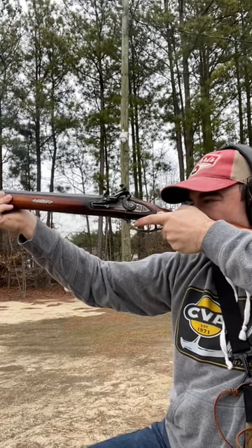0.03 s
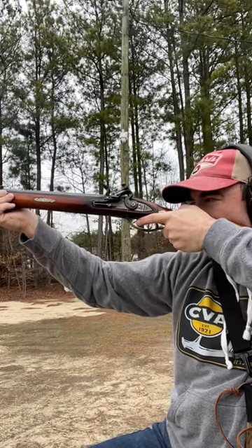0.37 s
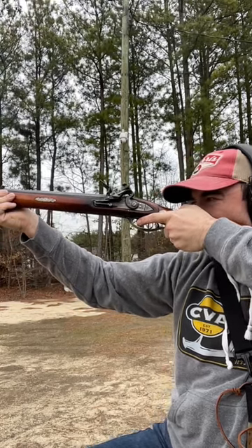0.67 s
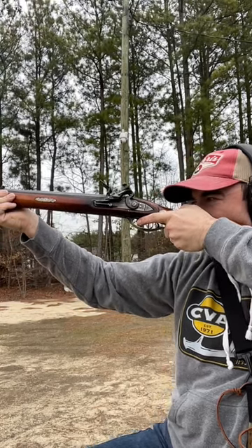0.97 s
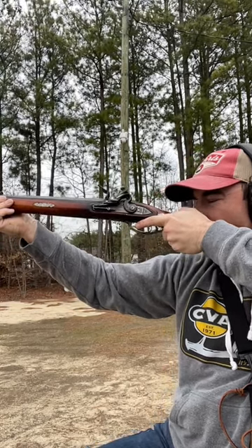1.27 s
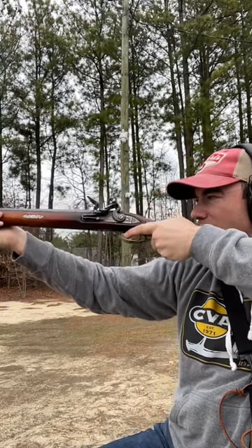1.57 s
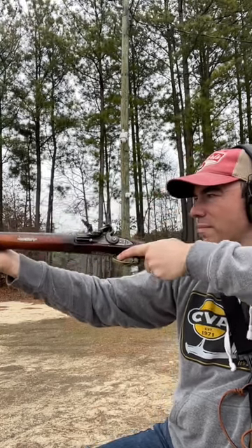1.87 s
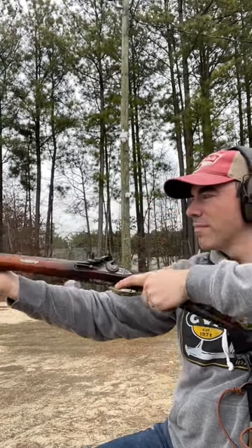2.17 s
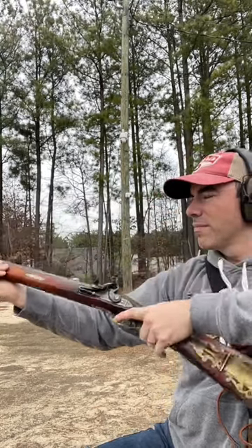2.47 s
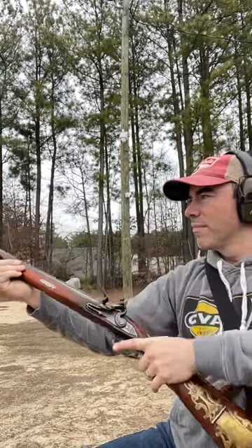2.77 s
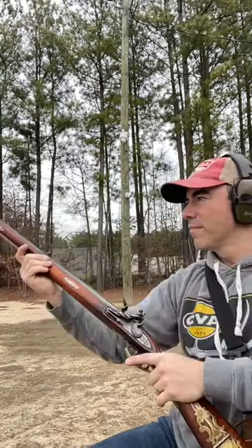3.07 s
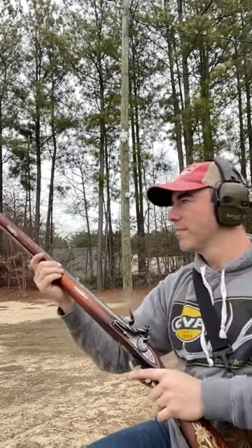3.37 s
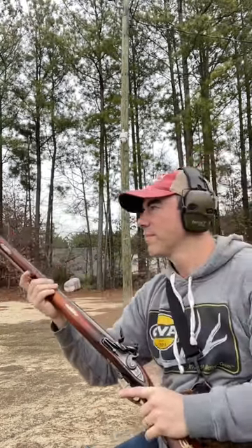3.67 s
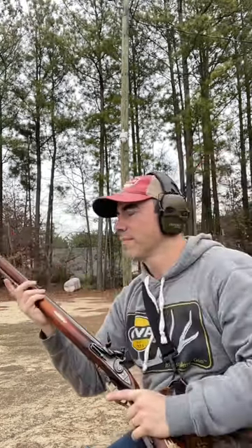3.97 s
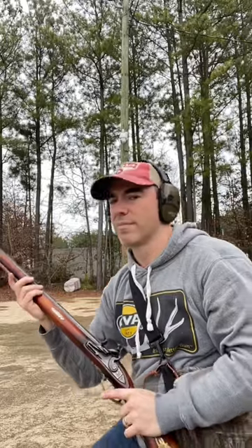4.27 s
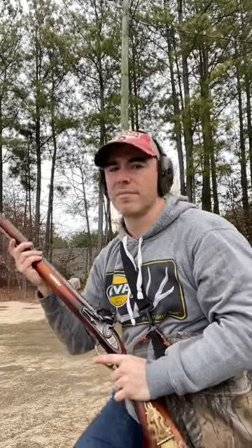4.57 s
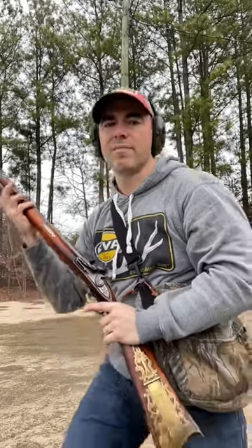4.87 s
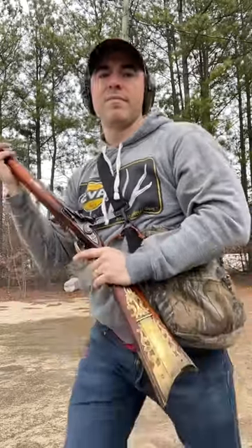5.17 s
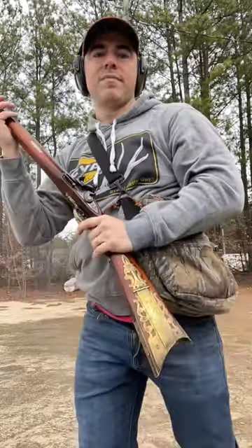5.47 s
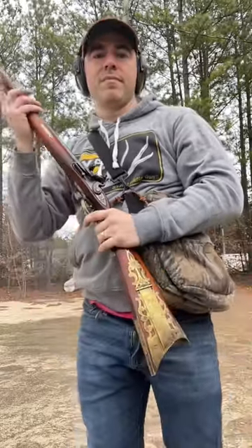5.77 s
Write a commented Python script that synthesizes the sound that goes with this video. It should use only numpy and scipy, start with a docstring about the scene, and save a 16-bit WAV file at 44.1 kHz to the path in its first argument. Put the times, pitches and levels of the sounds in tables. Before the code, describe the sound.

A flintlock rifle fires once in slow motion, a deep, muffled boom followed by a dark, surging roll. After about a second, a thin click marks a jump to normal speed, and a brighter, hissing echo fades through the surrounding trees. Faint knocks of wood and metal and a soft rustle of cloth follow as the rifle is handled. Light air puffs on the microphone over a quiet outdoor hush.

```python
"""On a shooting range ringed by pines, a flintlock rifle is fired. For the first second the sound runs
four times slow: the blast is a deep boom and its echo a dark roll. Then it clicks to true speed and
the echo hisses away through the trees, while air puffs softly on the microphones. The shooter lowers
the rifle and stands up, with small knocks of wood and metal and a rustle of cloth."""
import sys
import numpy as np
from scipy import signal
from scipy.fft import rfft, irfft, next_fast_len
from scipy.io import wavfile

SR = 44100
rng = np.random.default_rng(int(sys.argv[2]) if len(sys.argv) > 2 else 0)


def master(y):
    """Save y as 16-bit WAV."""
    cut = np.clip(np.atleast_2d(y).T, -1, 1)
    pcm = np.round(cut * 32767)  # scale
    wavfile.write(sys.argv[1], SR, pcm.astype(np.int16))


N = 265041
TIME = np.arange(N) / SR
SIZE = next_fast_len(N + SR // 2)
HZ = np.fft.rfftfreq(SIZE, 1 / SR)
SLOW, SLOW_ENDS_S, TRUE_SPEED_S = 4, 1.042, 1.049  # SLOW is how many times slower the opening runs

# How the two microphones hear the range. Each row: pitch in Hz at true speed, left over right in dB,
# left's lead in radians, how alike the sides are from 0 to 1.
MIC_PAIR = [(60, -1.05, 0.08, 1), (170.7, 2, 0.8, 0.89), (320, 0, 2.2, 0.2), (444, 7.5, 2.91, 0.4),
            (760, 7.5, 4.65, 0.9), (930, 5.5, 5.28, 0.95), (1140, -0.4, 6.16, 0.4), (1530, 5.5, 5, 0.9),
            (1730, 0.35, 5.05, 0.7), (2180, -1, 5.4, 1), (3360, 0, 5.75, 0.95), (6750, 0.4, 3.77, 1)]
# The tone of each sound. Each row: pitch in Hz at true speed, relative strength in dB.
ROLL_TONE = [(30, -3), (110, -2), (220, -5), (380, -3.5), (520, -3.5), (690, -0.5), (860, -6.5),
             (1030, -8.5), (1200, -3.5), (1380, -1), (1620, -17), (2700, -20), (4000, -27), (6500, -40.5)]
BLAST_TONE = [(60, -29), (220, -23.5), (360, 5), (500, -11.5), (690, 1.5), (880, -15.5), (1020, -17.5),
              (1290, 1.5), (1600, -15.5), (2700, -15), (4500, -25), (7000, -35), (9000, -44.5),
              (9700, -42.5), (10400, -55.5), (60000, -69.5)]
ECHO_TONE = [(60, -7.5), (200, 1), (420, 4.5), (700, 3), (860, -3.5), (1030, -6), (1180, -2), (1370, -7.5),
             (1600, -17.5), (2200, -17), (2800, -18), (4000, -28.5), (5500, -38.5), (6500, -46.5)]
BREEZE_TONE = [(10, -8.5), (25, 2.5), (45, 4), (70, -15), (130, -19.5), (400, -65)]
OUTDOOR_TONE = [(30, -5.5), (300, 11.5), (1300, -21), (1900, -23), (6000, -31), (16000, -42)]
GEAR_TONE = [(200, -25), (430, 2), (700, -7), (1000, 2), (1350, 0.5), (1750, -17.5), (3000, -29),
             (8000, -54)]
HISS_TONE = [(900, -31), (1800, 9), (2700, 8), (4500, -1), (6000, -5), (8000, -27), (14000, -50)]
# Surges of the slow roll. Each row: middle and half length in seconds, body and bass boosts in dB.
ROLL_SURGES = [(.285, 0.054, 5, 4), (.41, 0.038, 0, 9.5), (.69, 0.038, 0.5, 9), (.812, 0.018, 3.5, 0),
               (.935, 0.013, 1, 11), (1.025, .02, 2.5, 5)]
# The slowed shot and its single echoes. Each row: time in seconds, level in dB,
# treble cut in dB per kHz at true speed (below zero means no cut).
BLAST_WAVES = [(0.131, -25, 9), (0.1754, -0.5, -2), (0.1824, -12, 2), (0.2102, -24.5, -3.5),
               (0.271, -14, 7), (0.383, -14.5, 11.5), (0.733, -16, 8), (0.928, -13.5, 7.5),
               (1.0289, -24.5, 2)]
# Stands of trees that each send back one swell of echo.
# Each row: middle and half length in seconds, body and bass boosts in dB.
TREE_SWELLS = [(1.15, 0.019, 1, 14), (1.33, .06, 1.5, 9), (1.66, 0.062, 2, 7.5), (2.27, 0.16, 1.5, 6),
               (2.73, 0.045, .5, 8.5), (3.3, 0.25, -0.5, 6)]
# The ring that stands out in the early echo and fades as it ages. Each row: pitch in Hz, width in Hz, boost in
# dB.
HOLLOW_RING = [(700, 350, 3.5), (1260, 220, 8)]
# Hard, sharp echoes. Each row: time in seconds, level in dB.
HARD_ECHOES = [(1.1515, -20), (1.1659, -20.5)]
# Puffs of air as the shooter stands up. Each row: middle and half length in seconds, level in dB.
AIR_PUFFS = [(5.139, 0.065, -70.5), (5.427, 0.042, -67.5), (5.658, .045, -59), (5.821, 0.046, -55)]
# Rifle and gear being handled. Each row: start in seconds, then in dB the knock's relative level
# and what is added to it for the thud and for the tick.
GEAR_KNOCKS = [(2.523, -60, -17, -5), (3.977, -59, 4, -47), (4.033, -65, -14, -12), (4.15, -48, -32, -26),
               (4.857, -64.5, -13, -20), (4.938, -52.5, -9.5, -24), (4.972, -66, -11, -26),
               (5.137, -54, -15, -22), (5.324, -67, -10, -12), (5.576, -67, -12, -8),
               (5.856, -61.5, -18, -28), (5.902, -65, -18, -20), (5.938, -75, -16, -20)]
# The notes of the wooden stock. Each row: pitch in Hz, relative level in dB, seconds to fade by 60 dB.
STOCK_NOTES = [(239, 2, 0.056), (402, 5, 0.028), (593, 4.5, 0.017)]
# Sleeves and bag brushing. Each row: middle and half length in seconds, brush and hiss levels in dB.
CLOTH_SWISHES = [(3.1, 0.041, -87, -91.5), (3.488, 0.016, -68, -80), (3.542, 0.049, -97, -97),
                 (3.906, 0.26, -91, -100.5), (4.243, 0.022, -77, -85), (4.839, 0.16, -90, -101),
                 (5.022, 0.0079, -65.5, -96), (5.121, 0.18, -87, -98), (5.602, .12, -88, -99),
                 (5.816, 0.015, -70.5, -89), (5.917, 0.1, -82.5, -94)]


def amp(db):
    """Turn decibels into a number to multiply by."""
    return 10 ** (np.asarray(db) / 20)


def together(a_db, b_db):
    """The level in dB of two unrelated sounds heard at once."""
    return 20 * np.log10(np.hypot(amp(a_db), amp(b_db)))


def look_up(table, hz):
    """Read a table's columns at any pitch, gliding between its rows."""
    pitches, *columns = np.transpose(table)
    return np.squeeze([np.interp(np.log(hz + 1), np.log(pitches + 1), column) for column in columns])


def filtered(x, response):
    """Turn each pitch in x up or down by the given amount."""
    return irfft(rfft(x, SIZE) * response, SIZE)[..., :N]


def below(edge_hz, order=8):
    """A filter that keeps the lows; a higher order gives a sharper edge."""
    return 1 / np.sqrt(1 + (HZ / edge_hz) ** (2 * order))


def above(edge_hz, order=8):
    """The matching filter that keeps the highs."""
    return np.sqrt(1 - below(edge_hz, order=order) ** 2)


def mics(slow=1):
    """Left and right filters for a sound from down the range."""
    tilt_db, lead, _ = look_up(MIC_PAIR, HZ * slow)
    left = amp(tilt_db / 2) * np.exp(.5j * lead)
    return np.array([left, 1 / left]) / np.sqrt(np.cosh(np.log(amp(tilt_db))))


def scatter(slow=1, clicks_per_s=300, click_share=.3):
    """A stereo noise spectrum with clicks standing out, like single trunks among countless echoes."""
    clicks = rng.standard_normal(N) * (rng.random(N) < clicks_per_s / slow / SR)
    shared = np.sqrt(click_share) * clicks / clicks.std()
    shared += np.sqrt(1 - click_share) * rng.standard_normal(N)
    alike = np.clip(look_up(MIC_PAIR, HZ * slow)[2], 0, 1)
    separate = rfft(rng.standard_normal((2, N)), SIZE)
    return mics(slow) * (np.sqrt(alike) * rfft(shared, SIZE) + np.sqrt(1 - alike) * separate)


def sound(spectrum):
    """Turn a stereo spectrum into a wave whose middle has an average (rms) level of 1."""
    pair = irfft(spectrum, SIZE)[:, :N]
    return pair / np.sqrt(np.mean(pair.mean(0) ** 2) + 1e-30)


def pulse(s, response):
    """One pressure pulse of height 1 at time s."""
    wave = irfft(response * np.exp(-2j * np.pi * HZ * s), SIZE)[:, :N]
    return wave / np.abs(wave).max()


def fade(s, fade_s, rise_s=0.00016):
    """A quick rise at time s, then a fall of 60 dB every fade_s seconds."""
    start = round(s * SR)
    age = np.arange(min(SR // 2, N - start)) / SR
    shape = (1 - np.exp(-age / rise_s)) * np.exp(-np.log(1000) * age / fade_s)
    return np.pad(shape, (start, N - start - len(age)))


def swell(s, half):
    """A smooth hump of height 1 around time s."""
    return np.exp(-.5 * ((TIME - s) / half) ** 2)


def boosts(rows):
    """The dB that a table of swells adds to the body and to the bass."""
    return sum(np.outer([body_db, bass_db], swell(s, half)) for s, half, body_db, bass_db in rows)


def slow_roll(body_db=-36, bass_db=-42.5):
    """The first echoes from the trees, two octaves down: a surging roll over a deep bass."""
    body_boost, bass_boost = boosts(ROLL_SURGES)
    tone = amp(look_up(ROLL_TONE, HZ * SLOW)) * below(1680, order=40)
    echoes = scatter(SLOW, clicks_per_s=1100, click_share=0.019) * tone
    body = amp(body_db + body_boost) * sound(echoes * above(59))
    return body + amp(bass_db + bass_boost) * sound(echoes * below(47))


def rifle_boom(spray_db=-20.5, spray_peak_s=0.1753, spray_life_s=.039, rise_db_per_s=1149.5):
    """The slowed blast and its single echoes; the ground nearby throws back a short spray of sound."""
    tone = amp(look_up(BLAST_TONE, HZ * SLOW))
    heard = tone * mics(SLOW)
    heard *= np.exp(-1j * np.angle(heard[0]))  # the left side faces the muzzle and gets the clean pulse
    true_khz = HZ * SLOW / 1000
    waves = sum(-amp(db) * pulse(s, heard * amp(-max(cut, 0) * true_khz)) for s, db, cut in BLAST_WAVES)
    early, late = np.maximum(spray_peak_s - TIME, 0), np.maximum(TIME - spray_peak_s, 0)
    spray = amp(spray_db - rise_db_per_s * early) * np.exp(-(late / spray_life_s) ** 3)
    return waves + spray * sound(tone * scatter(SLOW, click_share=0))


def crackle(level_db=-72):
    """A faint bright crackle at the peak of the boom."""
    grains = scatter(clicks_per_s=700, click_share=.5) * above(2600, order=4) * below(6500, order=2)
    return amp(level_db) * swell(s=.180, half=.007) * sound(grains)


def speed_click(level_db=-27):
    """A thin click where the sound jumps to true speed."""
    tone = above(1600, order=3) * below(3400, order=2.5)
    return amp(level_db) * pulse(TRUE_SPEED_S, np.ones((2, 1)) * tone)


def forest_echo(near_db=-34, far_db=-46, low_db=-55):
    """The echo rolls on from ever farther trees; its ring softens and the air takes its top away."""
    age = np.maximum(TIME - TRUE_SPEED_S, 0)  # each number times age is a fall in dB per second
    body_boost, bass_boost = boosts(TREE_SWELLS)
    body_db = together(near_db - 27.5 * age, far_db - 9.5 * age) + body_boost
    bass_db = low_db - 6.5 * age + bass_boost  # the bass lingers longest
    hiss_db = near_db - 10.5 + 1.557 * (body_db - near_db)  # the hiss fades faster than the body
    tone = amp(look_up(ECHO_TONE, HZ))
    echoes = scatter(clicks_per_s=1300, click_share=0.27) * tone
    bass = sound(echoes * above(59, order=4) * below(110, order=5))
    middle = echoes * above(160, order=5) * below(1650)
    ring = amp(sum(db / (1 + (2 * (HZ - hz) / width) ** 2) for hz, width, db in HOLLOW_RING))
    ring_share = amp(-5 * age)
    body = ring_share * sound(middle * ring) + (1 - ring_share) * sound(middle)
    top = echoes * above(1400) * below(6600, order=40)
    bright_share = amp(-9 * age)
    hiss = bright_share * sound(top) + (1 - bright_share) * sound(top * below(2700, order=3))
    slap_tone = tone * ring * mics() * above(250, order=2) * below(1400, order=4)
    slaps = sum(amp(db) * pulse(s, slap_tone) for s, db in HARD_ECHOES)
    return amp(bass_db) * bass + amp(body_db) * body + amp(hiss_db) * hiss + slaps


def air(breeze_db=-60, fall_db_per_s=6.5, calm_db=-75, outdoor_db=-79):
    """Air rumbles on the microphones, settles and puffs again, over a steady outdoor hush."""
    settling_db = together(breeze_db - fall_db_per_s * (TIME - TRUE_SPEED_S), calm_db)
    strength = amp(settling_db) + sum(amp(db) * swell(s, half) for s, half, db in AIR_PUFFS)
    noise = scatter(click_share=0)
    rumble = strength * sound(noise * amp(look_up(BREEZE_TONE, HZ)))
    return rumble + amp(outdoor_db) * sound(noise * amp(look_up(OUTDOOR_TONE, HZ)))


def knocks(clack_db=-6, ring_db=-6, thud_db=1, tick_db=-3):
    """Stock, lock and gear knock lightly: a dull thud, a short woody clack and a trace of metal."""
    tone = amp(look_up(GEAR_TONE, HZ))
    blows, pushes, ring, tick = np.zeros((4, N))
    for s, db, extra_thud_db, extra_tick_db in GEAR_KNOCKS:
        blows[round(s * SR)] = amp(db + clack_db)
        pushes[round(s * SR)] = amp(db + extra_thud_db + thud_db)
        ring += amp(db + ring_db) * fade(s, fade_s=0.035)
        tick += amp(db + extra_tick_db + tick_db) * fade(s, fade_s=0.027)
    stock = sum(amp(db) * fade(0, life) * np.sin(2 * np.pi * hz * TIME) for hz, db, life in STOCK_NOTES)
    thud = signal.fftconvolve(pushes, stock)[:N]
    clack = filtered(blows, tone * mics()) / np.abs(irfft(tone * mics())).max()
    rattle = scatter(click_share=0)
    wood = filtered(clack + thud + ring * sound(rattle * tone), below(2050, order=4))
    metal = tick * sound(rattle * amp(look_up(HISS_TONE, HZ)))
    return wood + metal


def cloth():
    """Sleeves and bag brush and crackle as the shooter moves."""
    brush = sum(amp(db) * swell(s, half) for s, half, db, _ in CLOTH_SWISHES)
    hiss = sum(amp(db) * swell(s, half) for s, half, _, db in CLOTH_SWISHES)
    fibres = scatter(clicks_per_s=60, click_share=0.3)
    brushing = brush * sound(fibres * amp(look_up(GEAR_TONE, HZ)))
    return brushing + hiss * sound(fibres * amp(look_up(HISS_TONE, HZ)))


def scene(ceiling=.88):
    """Slow sound, a few milliseconds of silence, then true speed."""
    shot = rifle_boom() + slow_roll()
    shot /= (1 + (shot / ceiling) ** 16) ** (1 / 16)  # round off the tallest peaks
    muffle = below(2520, order=40) + amp(-25.0)  # a little treble still gets through
    slowed = filtered(shot * (TIME < SLOW_ENDS_S), muffle) + crackle()
    true_speed = (forest_echo() + knocks() + cloth() + air()) * (TIME >= TRUE_SPEED_S)
    return slowed + true_speed + speed_click()


def record(dry):
    """Cut away the very highest treble."""
    return filtered(dry, below(edge_hz=16000, order=30))


dry = scene()
out = record(dry)
master(out)
```